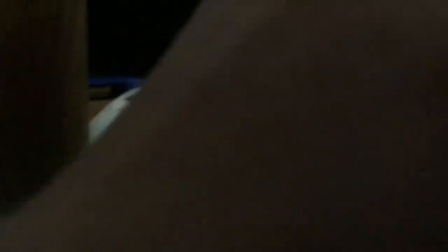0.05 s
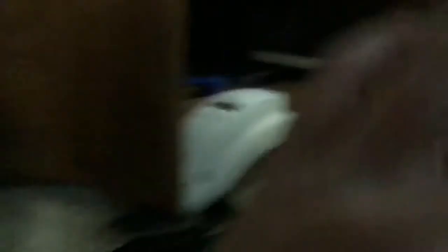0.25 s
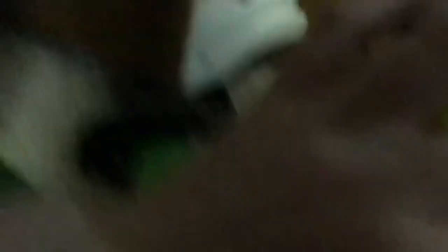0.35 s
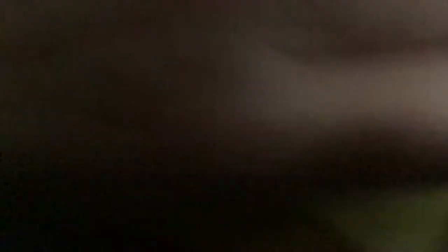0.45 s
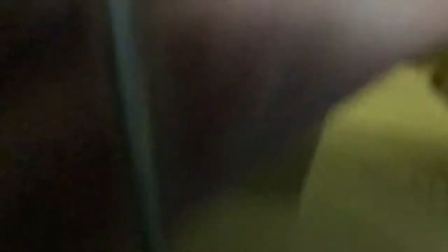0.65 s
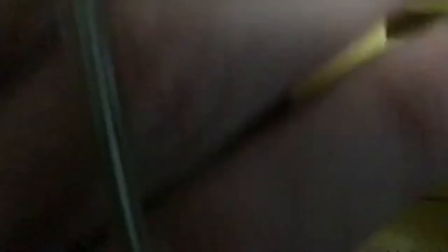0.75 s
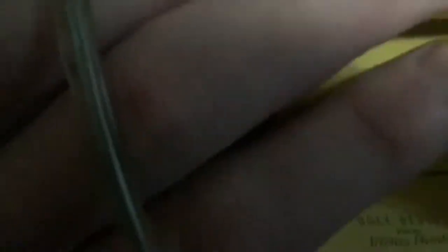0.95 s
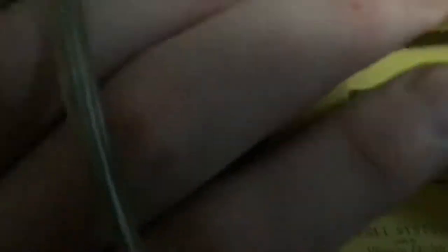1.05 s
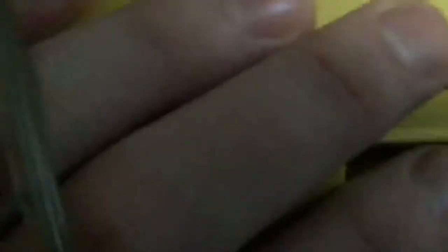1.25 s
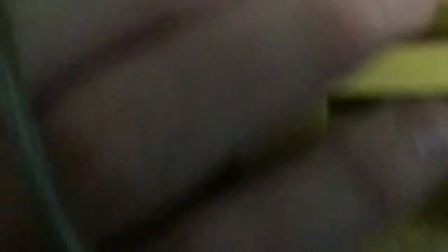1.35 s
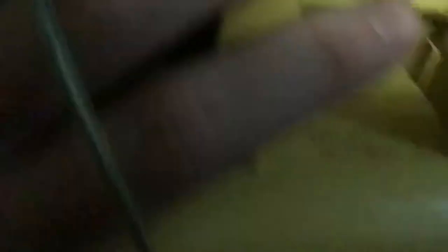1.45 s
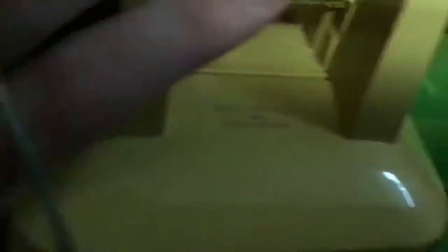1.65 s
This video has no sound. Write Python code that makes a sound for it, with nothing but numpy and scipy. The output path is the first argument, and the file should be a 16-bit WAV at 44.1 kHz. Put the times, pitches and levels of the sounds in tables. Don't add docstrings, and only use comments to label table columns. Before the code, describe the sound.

Hard plastic housing knocked and handled close up, one loud clack, then two sharp latch clicks

```python
import sys
import numpy as np
from scipy import signal
from scipy.fft import rfft, irfft, next_fast_len
from scipy.io import wavfile
from scipy.ndimage import uniform_filter1d

SR = 44100
rng = np.random.default_rng(int(sys.argv[2]) if len(sys.argv) > 2 else 0)


def inscribe(sig):
    pcm = np.round(np.clip(np.atleast_2d(sig).T, -1, 1) * 32767)
    wavfile.write(sys.argv[1], SR, pcm.astype(np.int16))


def attenuation_scalar(level_db):
    decades = np.asarray(level_db, float) / 20
    return 10 ** decades


N = 74970

# start in seconds, peak level in dB, hardness in octaves above 1 kHz,
# extra bass weight in dB, level of the sharp edge in dB.
KNOCKS = [(0.057, -32, -1.57, 4, -45), (0.1226, -26.5, 2.7, -8, -15.5), (.125, -25, -0.014, 0, -18),
          (0.16, -19, -0.7, 9.5, -10), (0.2284, -2.2, 2.8, -18, -6.5), (0.2377, 2.67, 0.16, 4.1, -18.5),
          (.262, -21, 0.088, 13.5, -29.5), (.307, -20, 0.97, 14.5, -30), (.363, -32, 0.62, 19.5, -25.5),
          (.521, -32.5, -0.72, 7, -37), (0.683, -34, -0.18, -4, -27), (.702, -32, 0.39, -11, -23),
          (.705, -24.5, 0.15, -3, -28.5), (.727, -22.5, 0.67, 12, -36), (.736, -22, 0.15, -15, -26),
          (0.971, -23, 1.02, 21.5, -15), (1.21, -44.5, -2.8, 14.5, -34), (1.2508, -10.5, 1.7, 6, -24),
          (1.3133, -9.5, -0.69, -14.5, -50.5)]
# frequency in Hz, level in dB.
CASING_COLOUR = [(24, -32), (45, -17.5), (70, -5), (300, -4), (650, 1.5), (2000, 1), (4500, -13.5),
                 (9000, -34)]
# frequency in Hz, width in Hz, height in dB.
CASING_NOTCHES = [(125, 10, 4.5), (930, 98, -3), (2775, 690, -13.5)]
# start in seconds, peak level in dB, tail level in dB, tilt in dB per octave.
SNAPS = [
    (0.5102, -18, -8.5, -2.5),
    (1.0756, -15, -12.5, 0.5),
]
# frequency in Hz, level in dB.
LATCH_COLOUR = [(400, -30), (1000, -10), (2000, -8.5), (3200, -3.5), (5000, -2), (9000, -7.5), (14500, -14),
                (16500, -25.5)]
# frequency in Hz, level in dB, time to fall 60 dB in seconds.
LATCH_MODES = [(1100, -21.5, 0.096), (1720, -20.5, 0.077), (2725, -19, 0.06), (3910, -19, 0.055),
               (4800, -20, 0.02), (8975, -10, 0.027)]
# time in seconds, level in dB, brightness in dB per octave.
RUB = [(0, -60.5, -1.5), (0.109, -64.5, 0.5), (.125, -41.5, -9), (.17, -44, -0.5), (.22, -38.5, -3),
       (.28, -41.5, -1), (.3, -59, -3.5), (.4, -77, -9), (.9, -64, -7), (1.0, -56.5, -10),
       (1.221, -65.5, -10), (1.28, -59, 3.5), (1.4, -51.5, -3.5), (1.51, -58, 6), (1.7, -70.5, 8)]
# frequency in Hz, level in dB.
RUB_COLOUR = [(100, -26), (300, -13.5), (800, 2), (2500, -10.5), (4500, -19.5), (6000, -26.5),
              (11500, -28.5), (15800, -28.5)]
# time in seconds, level in dB.
SHUFFLE = [(0, -45.5), (.1, -46.5), (.22, -47), (.35, -52.5), (.45, -60), (.55, -57.5), (.65, -52.5),
           (.8, -53.5), (.95, -52.5), (1.13, -52.5), (1.3, -47), (1.45, -53), (1.6, -50), (1.7, -49.5)]
# frequency in Hz, level in dB.
SHUFFLE_COLOUR = [(25, -44.5), (60, -13), (125, 1.5), (230, 1), (400, -8.5), (630, -4.5), (1000, -26.5),
                  (4000, -87)]
# time in seconds, level in dB, pitch in Hz.
SQUEAK = [(.52, -54, 3680), (.6, -84, 3550), (0.719, -76, 3727), (.85, -74.5, 3670), (.99, -63.5, 3655),
          (1.06, -71, 3700), (1.2, -75.5, 3650)]
# start in seconds, average
# (rms) level in dB, time to fall 60 dB in seconds, # centre in Hz, width in octaves.
SCUFFS = [(.0351, -58, 0.041, 6200, 0.72), (.0395, -44.5, 0.057, 1930, 1.36),
          (.0405, -56, 0.091, 3620, .31), (.0422, -24, 0.039, 666, 1.04), (.2551, -42.5, 0.096, 3260, 1.4),
          (.3291, -59, 0.039, 10190, 1.1), (.4971, -57.5, .11, 7100, 0.37), (.5161, -28.5, 0.11, 215, 0.73),
          (.525, -41.5, 0.18, 575, 0.61), (.7151, -70.5, .3, 10700, 1.2), (.9701, -66, .31, 4800, .41),
          (1.0291, -42, 0.045, 1790, .31), (1.065, -57.5, 0.19, 7600, 0.2),
          (1.0801, -38.5, 0.19, 242, 0.74), (1.085, -46, 0.18, 600, 0.47), (1.255, -35, 0.19, 125, 0.52)]
# frequency in Hz, level in dB.
AIR_COLOUR = [(300, -13.5), (640, -21.5), (1000, -11.5), (2200, -23.5), (4000, -25.5), (6000, -30.5),
              (15000, -45), (16200, -61)]
# frequency in Hz, level in dB.
HUM = [(120, -63.5), (615, -62.5)]
# frequency in Hz, width in Hz, height in dB.
MIC_PORT = [(3700, 700, 2), (7300, 1000, -9), (8800, 1300, 7), (10000, 700, -6), (11400, 1400, 5),
            (14300, 1500, 4)]

KNOCK_DB, WEIGHT_HZ = 3, 400
RATTLE_DB, RATTLE_T60 = -31, 0.04
SNAP_DB, SNAP_T60, SNAP_RISE_S = -0.5, 0.017, 0.001
SHELL_DB, SHELL_T60, ROOM_DB, ROOM_T60 = -0.5, 0.0587, -14.5, 0.23
TAIL_DULL_HZ, PIVOT_HZ = 6900, 2020
RUB_DB, RUB_PATCH_DB, FIZZ_HZ = 2, 1.2, 4500
SHUFFLE_DB, SHUFFLE_PATCH_DB = 0.5, 1.5
SQUEAK_DB, SQUEAK_WIDTH_HZ = 3.5, 400
SCUFF_RISE_S = 0.0024
AIR_DB, AIR_PATCH_DB = -63.5, 1.2
BASS_LAG_CYCLES, LAG_FROM_HZ, LAG_TO_HZ = 1.4, 12, 2420


def evened(x):
    return x / np.sqrt(np.mean(x ** 2) + 1e-20)


def read(points, hz):
    f, value = np.transpose(points)
    return np.interp(np.log(hz + 1), np.log(f + 1), value)


def bumps(points, hz):
    return sum(db / (1 + (2 * (hz - centre) / width) ** 2) for centre, width, db in points)


def causal(db):
    both_sides = np.r_[db, db[-2:0:-1]]
    log_gain = np.log(attenuation_scalar(np.maximum(both_sides, -100)))
    taps = np.fft.ifft(np.exp(np.conj(signal.hilbert(log_gain)))).real
    return taps / abs(taps).max()


def resonate(x, hz, width_hz):
    turn = np.exp(2j * np.pi * np.cumsum(hz * np.ones(len(x))) / SR)
    r = np.exp(-np.pi * width_hz / SR)
    return 2 * (turn * signal.lfilter([1 - r], [1, -r], x / turn)).real


def noise(colour, patch_db, tilt=0, size=512):
    hz = np.fft.rfftfreq(size, 1 / SR)
    a, b, patches = rng.standard_normal((4 * N // size + 5, len(hz), 3)).T
    patches = uniform_filter1d(patches, size=6, axis=0)
    patches = evened(uniform_filter1d(patches, size=8, axis=1))
    z = (a + 1j * b) * attenuation_scalar(read(colour, hz)[:, None] + patch_db * patches)
    untilted = signal.istft(z, nperseg=size)[1]
    octaves = np.log2(np.maximum(hz / FIZZ_HZ, 1))[:, None]
    z = z * attenuation_scalar(octaves * tilt)
    return signal.istft(z, nperseg=size, noverlap=3 * size // 4)[1][:N] / np.std(untilted)


def knock(start, db, hardness, weight_db, edge_db):
    hz = np.fft.rfftfreq(8192, 1 / SR)
    t = np.arange(4096) / SR
    pulse = np.exp(-(hz / (1000 * 2 ** hardness)) ** 2)
    weight = weight_db / (1 + (hz / WEIGHT_HZ) ** 2)
    colour = read(CASING_COLOUR, hz) + 20 * np.log10(pulse + attenuation_scalar(edge_db)) + weight
    colour = colour + bumps(CASING_NOTCHES, hz)
    drive = attenuation_scalar(RATTLE_DB - 60 * t / RATTLE_T60) * rng.standard_normal(len(t)) / 4
    drive[0] = 1
    return start, attenuation_scalar(db + KNOCK_DB) * signal.oaconvolve(drive, causal(colour)[:len(t)])


def snap(start, db, tail_db, tilt):
    t = np.arange(SR // 3) / SR
    hz = np.fft.rfftfreq(1024, 1 / SR)
    shell = attenuation_scalar(SHELL_DB - 60 * t / SHELL_T60)
    room = attenuation_scalar(ROOM_DB - 60 * t / ROOM_T60)
    bright, dull = rng.standard_normal((len(t), 2)).T
    dull = signal.lfilter(*signal.butter(1, TAIL_DULL_HZ, fs=SR), dull)
    burst = bright * attenuation_scalar(-60 * t / SNAP_T60) + dull * attenuation_scalar(tail_db) * (shell + room)
    burst = burst * np.minimum(t / SNAP_RISE_S, 1) ** 2
    colour = read(LATCH_COLOUR, hz) + tilt * np.log2(1 + hz / PIVOT_HZ)
    crack = signal.oaconvolve(burst, causal(colour))[:len(t)]
    ring = np.zeros(len(t))
    for mode_hz, mode_db, t60 in LATCH_MODES:
        pitch = mode_hz * rng.uniform(0.99, 1.03)
        ring += attenuation_scalar(mode_db - 60 * t / t60) * np.sin(2 * np.pi * pitch * t)
    return start, attenuation_scalar(db + SNAP_DB) * (crack / abs(crack).max() + ring)


def scuff(start, db, t60, centre_hz, octaves):
    t = np.arange(SR // 4) / SR
    hz = np.fft.rfftfreq(2048, 1 / SR)
    grit = rng.standard_normal(len(t)) * rng.exponential(1, len(t))
    colour = -12 * (np.log2((hz + 1) / centre_hz) / octaves) ** 2
    drag = evened(signal.oaconvolve(grit, causal(colour))[:len(t)])
    return start, attenuation_scalar(db - 60 * t / t60) * np.minimum(t / SCUFF_RISE_S, 1) * drag


def rubbing():
    s, db, brightness = np.transpose(RUB)
    tilt = np.interp(np.arange(N // 128 + 5) * 128 / SR, s, brightness)
    level = attenuation_scalar(RUB_DB + np.interp(np.arange(N) / SR, s, db))
    return level * noise(RUB_COLOUR, RUB_PATCH_DB, tilt)


def shuffling():
    level = attenuation_scalar(SHUFFLE_DB + np.interp(np.arange(N) / SR, *np.transpose(SHUFFLE)))
    return level * noise(SHUFFLE_COLOUR, SHUFFLE_PATCH_DB, size=2048)


def squeak():
    t = np.arange(N) / SR
    s, db, pitch = np.transpose(SQUEAK)
    hz = np.interp(t, s, pitch)
    once = resonate(rng.standard_normal(N), hz, SQUEAK_WIDTH_HZ)
    thin = evened(resonate(once, hz, SQUEAK_WIDTH_HZ))
    return thin * attenuation_scalar(SQUEAK_DB + np.interp(t, s, db, -99, -99))


def air():
    return attenuation_scalar(AIR_DB) * noise(AIR_COLOUR, AIR_PATCH_DB)


def hum():
    return sum(attenuation_scalar(db) * evened(resonate(rng.standard_normal(N), hz, 15)) for hz, db in HUM)


def add(mix, s, sound):
    part = mix[round(s * SR):][:len(sound)]
    part += sound[:len(part)]


def scene():
    mix = rubbing() + shuffling() + squeak() + air() + hum()
    for source, rows in ((knock, KNOCKS), (snap, SNAPS), (scuff, SCUFFS)):
        for row in rows:
            add(mix, *source(*row))
    return mix[None]


def low_pass(x):
    return signal.sosfilt(signal.butter(12, 16970, fs=SR, output="sos"), x)


def record(dry):
    size = next_fast_len(2 * N)
    hz = np.fft.rfftfreq(size, 1 / SR)
    cycles = BASS_LAG_CYCLES * np.log((1 + hz / LAG_FROM_HZ) / (1 + hz / LAG_TO_HZ))
    response = attenuation_scalar(bumps(MIC_PORT, hz)) * np.exp(-2j * np.pi * cycles)
    mix = irfft(rfft(dry, size) * response, size)[:, :N]
    return low_pass(mix)


dry = scene()
out = record(dry)
inscribe(out)
```